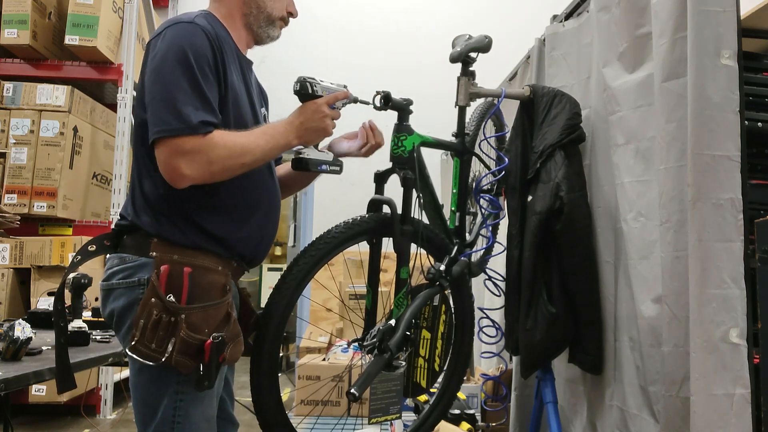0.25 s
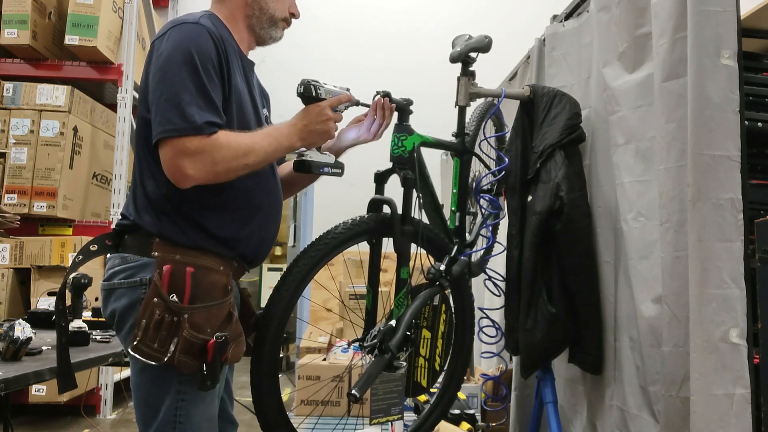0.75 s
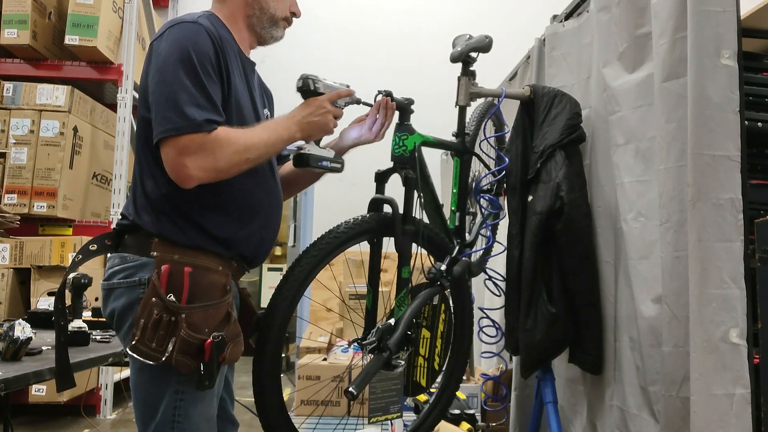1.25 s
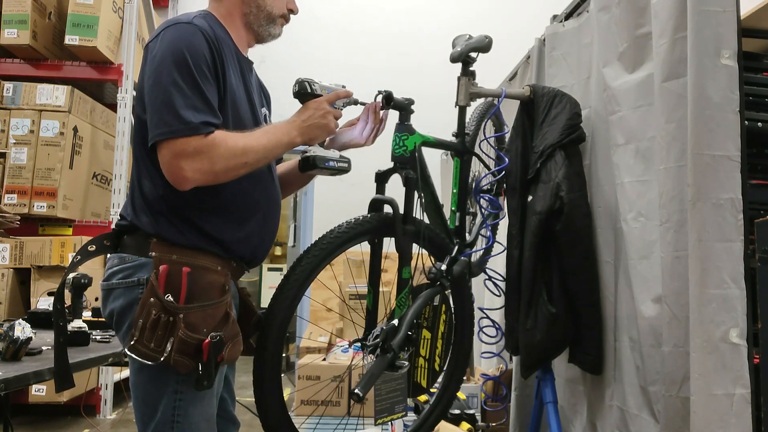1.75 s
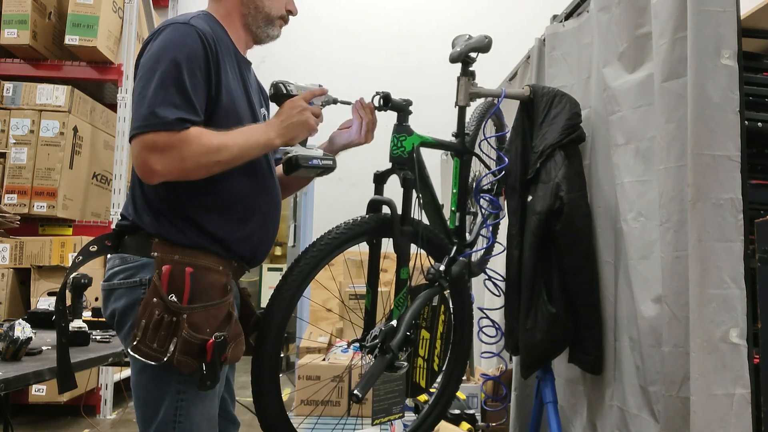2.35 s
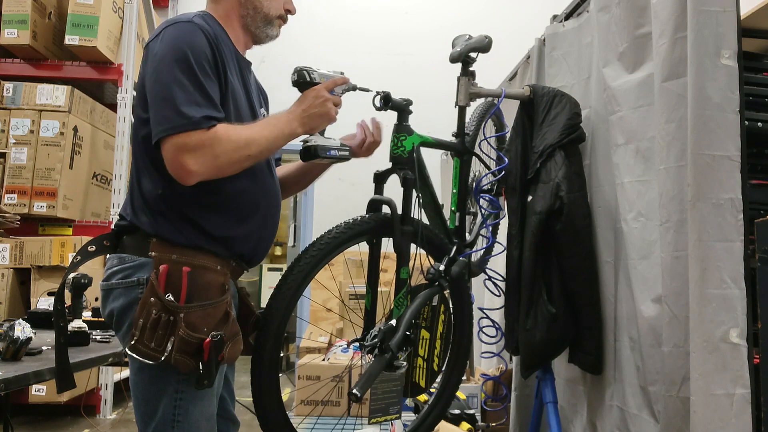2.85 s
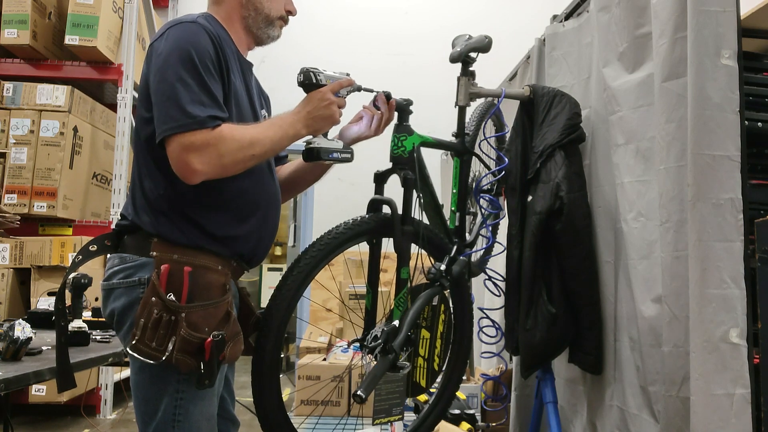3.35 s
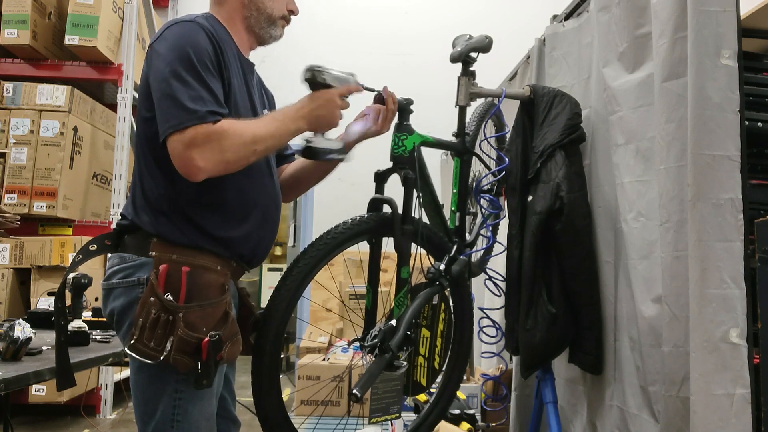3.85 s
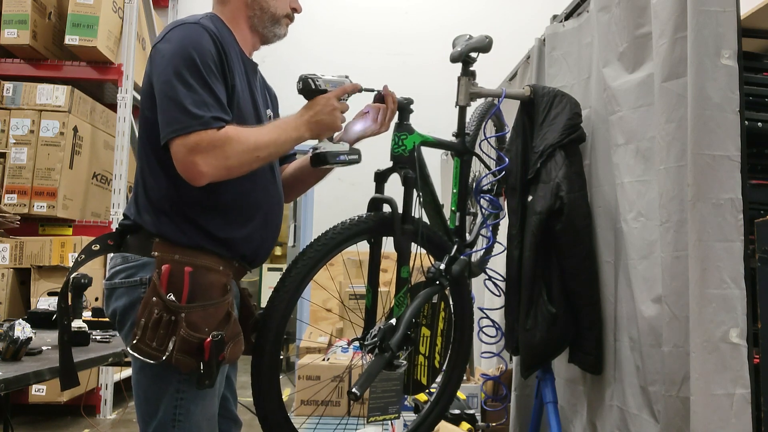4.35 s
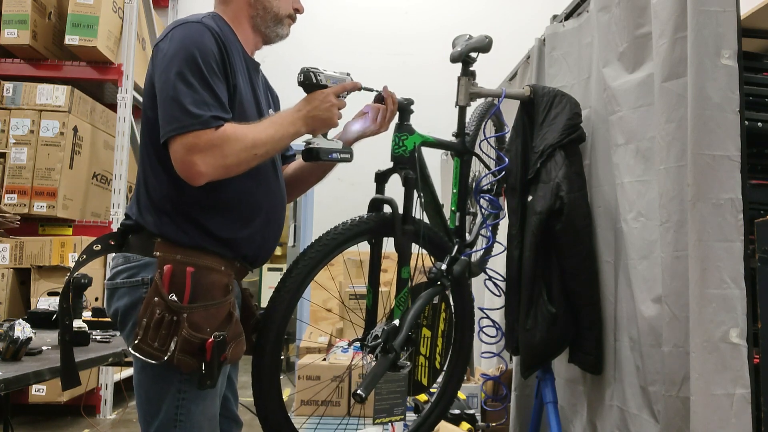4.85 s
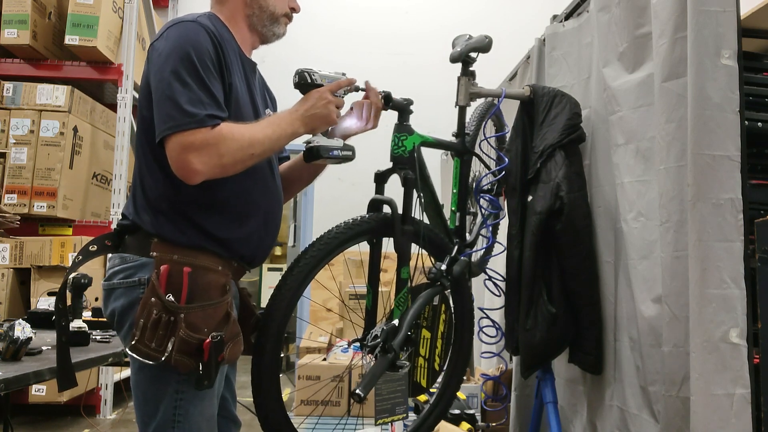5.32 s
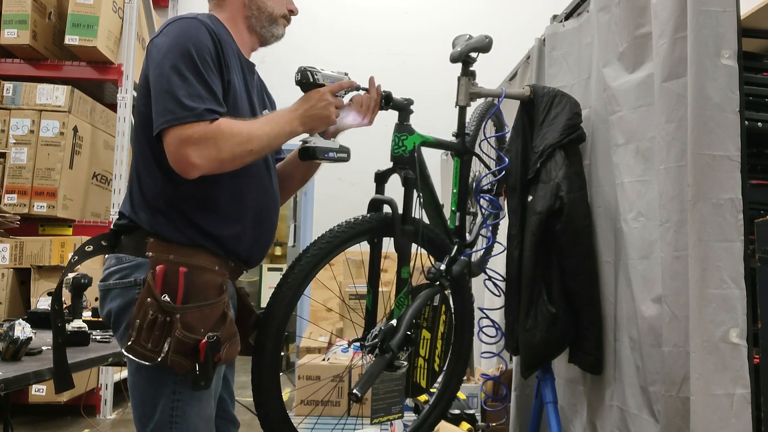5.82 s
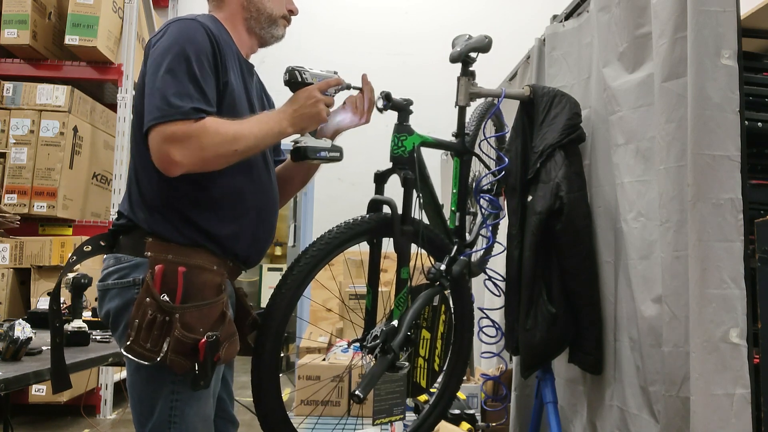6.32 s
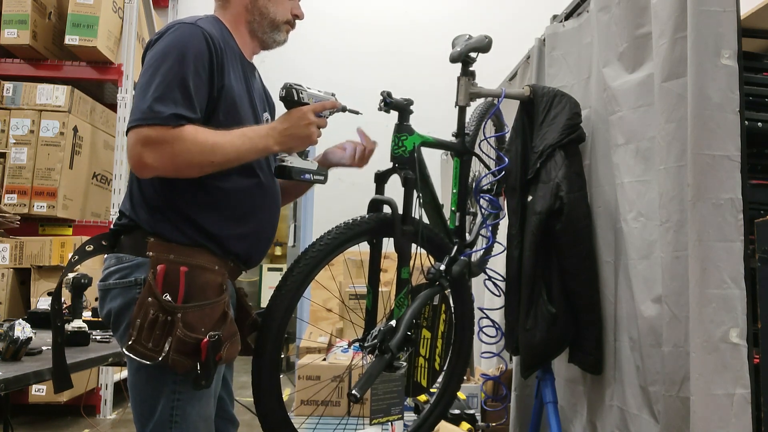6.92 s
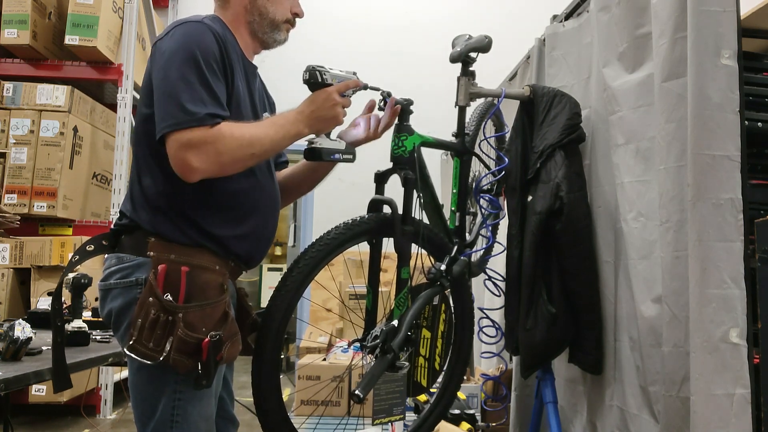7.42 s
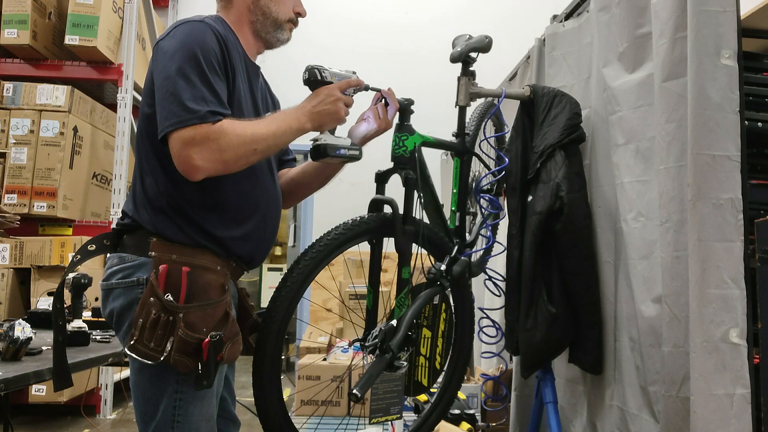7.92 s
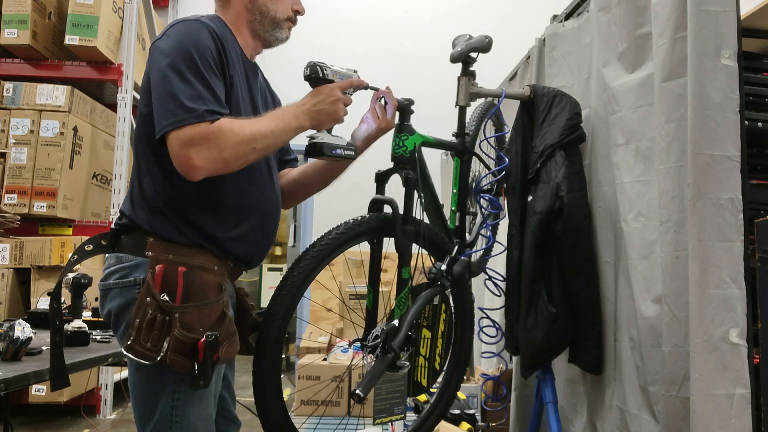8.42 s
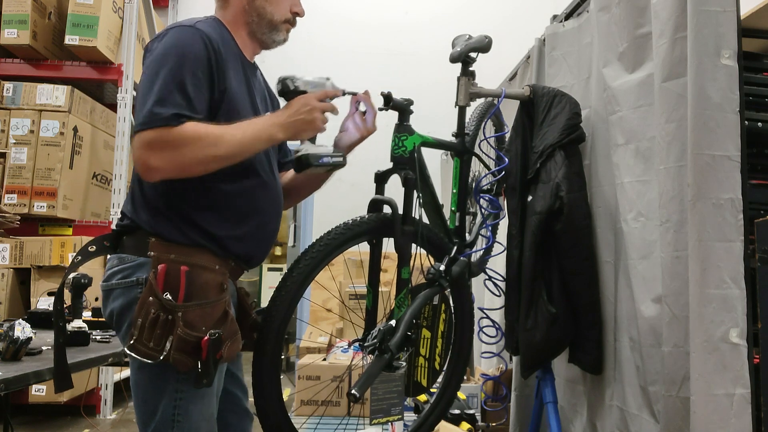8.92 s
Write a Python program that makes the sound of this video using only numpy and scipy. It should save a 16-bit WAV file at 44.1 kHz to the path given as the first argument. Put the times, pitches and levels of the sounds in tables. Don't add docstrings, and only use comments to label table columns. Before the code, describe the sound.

A quiet stockroom hums with ventilation. A close cordless screwdriver runs once for under a second, then gives three shorter buzzes amid trigger clicks and bright clinks of bit against steel bolts. A compressor across the room thuds, whines upward and settles into steady chugging, with one last screwdriver run over it. Small camera microphone, dull top end, hard-room echo.

```python
import sys
import numpy as np
from scipy import signal
from scipy.fft import rfft, irfft
from scipy.io import wavfile
from scipy.ndimage import uniform_filter1d

SR = 44100
rng = np.random.default_rng(int(sys.argv[2]) if len(sys.argv) > 2 else 0)


def file_out(sig):
    cols = np.atleast_2d(sig).T
    lim = np.clip(cols, -1, 1)
    pcm = np.round(lim * 32767).astype(np.int16)
    wavfile.write(sys.argv[1], SR, pcm)


def volts(x):
    e = np.asarray(x, float) / 20
    return 10 ** e


N = 404397
T = np.arange(N) / SR


def evened(x):
    return x / np.sqrt(np.mean(x ** 2) + 1e-20)


def read(points, hz):
    f, value = np.transpose(points)
    return np.interp(np.log(hz + 1), np.log(f + 1), value)


def add(mix, start_s, sound):
    part = mix[round(start_s * SR):][:len(sound)]
    part += sound[:len(part)]


def coloured(x, spectrum):
    gain = volts(read(spectrum, np.fft.rfftfreq(len(x), 1 / SR)))
    return evened(irfft(rfft(x) * gain, len(x)))


def resonate(x, hz, width_hz):
    turn = np.exp(2j * np.pi * np.cumsum(hz * np.ones(len(x))) / SR)
    r = np.exp(-np.pi * width_hz / SR)
    smooth = signal.lfilter([1 - r], [1, -r], x / turn)
    return evened((turn * smooth).real)


def wander(length, span):
    once = uniform_filter1d(rng.standard_normal(length), int(span))
    return evened(uniform_filter1d(once, int(span)))


# [Hz, dB per Hz]
VENTILATION = [(15, -34.5), (25, -22), (65, -3), (125, -6), (167, -7.5), (241, -8.5), (286, -12.5),
               (356, -8), (454, -18.5), (513, -17), (815, -21), (4820, -37), (6790, -40), (8450, -48),
               (11000, -85.5), (18600, -120)]
# [Hz, dB rms]
HUM_LINES = [(59.3, -65.5), (120, -63), (212.3, -65), (240.2, -60.5), (267.8, -74.5), (295.7, -76.5),
             (332.1, -69), (360, -73), (6700, -90)]


def stockroom():
    air = coloured(rng.standard_normal(N), VENTILATION) * volts(-59 + 1.4 * wander(N, 5000))
    lines = np.zeros(N)
    for hz, db in HUM_LINES:
        level = volts(db + 3 + 0.96 * wander(N, 3300))
        turns = hz * T + rng.random() + 0.041 * wander(N, 4000)
        lines += level * np.sin(2 * np.pi * turns)
    return air + lines


def ring(modes, t, t60_s, flutter_db):
    total = np.zeros(len(t))
    for hz, db, t60_factor in modes:
        luck_db, phase = 4 * rng.random(), rng.random()
        decay_db = -60 * t / (t60_factor * t60_s)
        rattle_db = flutter_db * (1.15 - abs(wander(len(t), 150)))
        total += volts(db + luck_db + decay_db + rattle_db) * np.sin(2 * np.pi * (hz * t + phase))
    return total


# [Hz, dB, ratio]
LOW_RING = [(3860, -11, 1.3), (4430, -7, 1.5), (4510, 0, .3), (4600, -4, .25), (5230, -13, 1),
            (3300, -17, .8)]
# [Hz, dB, ratio]
HIGH_RING = [(6600, -9, 1), (6965, -2, 1.5), (7527, 0, 1), (7628, -3, 1.1)]


def hit(tick_db, low_db, high_db, knock_db, t60_s):
    t = np.arange(SR // 4) / SR
    crack, puff = rng.standard_normal((2, len(t)))
    tick = coloured(crack, [(800, -36.0), (3000, 4.5), (7000, 5), (9000, -16.0)])
    tick *= volts(-60 * t / .018) + volts(-13 - 60 * t / (.7 * t60_s))
    knock = coloured(puff, [(350, -28.5), (700, -15), (1300, 1.5), (2500, -2.5), (5000, -17.5)])
    knock *= volts(knock_db - 60 * t / 0.093)
    low = volts(low_db) * ring(LOW_RING, t, t60_s, flutter_db=9.0)
    high = volts(high_db) * ring(HIGH_RING, t, t60_s, flutter_db=7.5)
    onset = np.minimum(t / .001, 1)
    return volts(tick_db - 10.5) * (tick + knock + low + high) * onset


# tick_db, low_ring_db, high_ring_db, knock_db [dB]
DROPPED_BOLT = (-24.5, -15, -12.5, -12.5)
# [s, dB]
CLINKS = [(0.8742, -63, -8, -10, -14), (2.5212, -39.5, -6, -6, -1.5), (2.5686, -28.5, -0.5, -2.5, -7),
          (2.579, -27.5, -11, -4, -19), (2.5895, -32, -22.5, 1, -17), (2.652, -36, -29, -11, -7),
          (3.093, -47, -3, -5, -3), (3.204, -39, -2, -6, -16.5), (3.23, -50, -7, 1, 1.5),
          (3.3752, -46, -4, -2, -3), (5.4458, -25.5, -10, -12.5, -19), (5.5924, -34.5, -14, -14, -1.5),
          (6.325, -37, -17, -5.5, 5.5), (6.6609, -38, -9.5, -0.5, -11.5), (6.6804, -36, -13.5, 0.5, 1),
          (6.7035, -32, -10, -9.5, -6), (7.589, -53.5, -10, -5, -1)]


def steel_clinks():
    layer = np.zeros(N)
    add(layer, 0, hit(*DROPPED_BOLT, t60_s=.2))
    for start_s, *levels in CLINKS:
        add(layer, start_s, hit(*levels, t60_s=0.11))
    return layer


def sing(hz, db, rise_s, t60_s, waver=.11):
    t = np.arange(2 * SR) / SR
    decay_db = -60 * np.maximum(t - rise_s, 0) / t60_s
    level = volts(db + decay_db + 18 * waver * wander(len(t), 400))
    turns = hz * t + waver * wander(len(t), 500)
    return np.minimum(t / rise_s, 1) * level * np.sin(2 * np.pi * turns)


# [s, Hz, dB, s, s]
SINGS = [(.8, 3550, -70, .32, .12), (0, 4450, -55, .002, .55), (3.03, 1970, -68, .05, .6),
         (3.08, 1570, -66, .07, .5), (3.74, 6950, -74, .02, .3), (3.4, 2700, -70, .03, .5),
         (4.28, 1560, -72, .08, .5), (.462, 5380, -63, .004, .5), (.462, 3600, -62, .004, .3),
         (.462, 4600, -64, .004, .45), (0, 5400, -62, .002, .5), (6.1, 2670, -38, .04, .5),
         (4.72, 2700, -42, .04, .6), (1.15, 900, -58, .006, .12), (.002, 1450, -58, .005, .4),
         (7.535, 6620, -64, .004, .4), (7.535, 1600, -60, .01, .3)]


def thin_rings():
    layer = np.zeros(N)
    for start_s, *tone in SINGS:
        add(layer, start_s, sing(*tone))
    return layer


# [s, dB]
CLICKS = [(0.46, -36.5, -35, -10), (1.129, -62.5, -23, 8), (1.1538, -52.5, -22, 8), (1.29, -55, -19, 0),
          (1.3067, -54, -31, -1), (1.4446, -50.5, -22, -16), (1.4848, -29, -18.5, -5),
          (2.172, -30.5, -40, 11.5), (3.5835, -58, -15, 4), (4.442, -56.5, -15, -4),
          (4.4757, -45, -15, 5.5), (4.506, -17.5, -34, -10), (5.8036, -41, -21, -7.5),
          (5.847, -21.5, -32, -13), (6.125, -8, -45.5, -26), (6.1358, -26, -47, -11), (6.4332, -31, -7, -9),
          (7.535, -48, -27, 5), (7.6972, -41.5, -8, -7)]


def plastic_clicks():
    layer = np.zeros(N)
    for start_s, tick_db, high_db, knock_db in CLICKS:
        add(layer, start_s, hit(tick_db, -60, high_db, knock_db, t60_s=0.11))
    return layer


# [of the mesh rate, dB]
MESH_ORDERS = [(1, -13), (2, 5), (3, 3.5), (4, 3.5), (5, 5), (6, 0.5)]
# [Hz, Hz, dB]
CHUCK_MODES = [(2350, 50, -7), (2460, 50, -6), (2570, 50, -3), (2670, 40, 2), (2800, 50, -2)]
# [Hz, Hz, dB]
HANDLE_MODES = [(885, 60, 0), (1035, 60, 0), (1190, 70, -2)]


def driver(pull_s, release_s, spin_up_s, mesh_hz, top_db, grip, casing):
    t = np.arange(0, release_s - pull_s + 0.47, 1 / SR)
    n = len(t)
    whine_db, chuck_db, growl_db = grip
    speed = 1 - np.exp(-(t + .01) / spin_up_s)
    coasting_s = np.maximum(t - release_s + pull_s, 0)
    engage = .45
    mesh = mesh_hz * (engage + (1 - engage) * speed) * np.exp(-coasting_s / .25)
    below_db = 32.5 * np.log10(speed) - 192.5 * coasting_s

    turns = np.cumsum(mesh * (1 + .019 * wander(n, 200))) / SR
    whine = np.zeros(n)
    for k, db in MESH_ORDERS:
        whine += volts(db + 4.5 * wander(n, 200)) * np.sin(2 * np.pi * k * turns)
    strain_db = 6 * (1 - speed)

    rub = rng.standard_normal(n) * volts(1.3 * wander(n, 73))
    chuck = sum(volts(db) * resonate(rub, hz, width) for hz, width, db in CHUCK_MODES)
    growl = sum(volts(db) * resonate(rub, hz, width) for hz, width, db in HANDLE_MODES)

    gears = coloured(rub, casing) + volts(whine_db + strain_db) * coloured(whine, casing)
    sound = volts(below_db) * gears
    sound += volts(growl_db + 0.48 * below_db) * evened(growl)
    sound += volts(chuck_db + 0.56 * below_db) * evened(chuck)
    return volts(top_db) * sound * signal.windows.tukey(n, .05)


# [s, s, s, Hz, dB]
PULLS = [
    (1.495, 2.186, 0.12, 1697, -24.5),
    (4.515, 4.717, 0.087, 1486, -24.5),
    (4.955, 5.325, 0.053, 1462, -24.5),
    (5.864, 6.106, 0.05, 1454, -26),
    (8.31, 8.948, .1, 1681, -24),
]
# whine_db, chuck_db, growl_db [dB against the noise]
GRIPS = [
    (-7, -16.5, -20.5),
    (-6, -12.5, -17.5),
    (-4.5, -11.5, -20.5),
    (-11, -8.5, -28),
    (-6, -8.5, -23.5),
]
# [Hz, dB per Hz]
CASINGS = [
    [(400, -36), (641, -33), (1140, -9), (2100, -11), (3330, -3), (5140, -5.5), (5990, -11.5), (6980, -3.5),
     (8450, -27)],
    [(400, -34.5), (658, -27), (1420, -1), (2130, -8.5), (2860, -2), (5480, -3), (6140, -10), (7070, 2),
     (8450, -26.5)],
    [(400, -37.5), (666, -25), (1150, -6.5), (2080, -10.5), (4030, -2), (4410, -4), (5200, -9.5),
     (7160, -6.5), (8450, -25.5)],
    [(400, -38), (650, -38.5), (1020, -8), (1690, -14), (2710, -5.5), (4240, -1.5), (4940, -9), (6890, -7),
     (8450, -25.5)],
    [(400, -16.5), (1140, -7.5), (1900, -22), (3330, 1.5), (5140, -2.5), (5990, -7), (6980, 1), (7730, -9),
     (8450, -30)],
]


def screwdriver():
    layer = np.zeros(N)
    for pull, grip, casing in zip(PULLS, GRIPS, CASINGS):
        add(layer, pull[0], driver(*pull, grip, casing))
    return layer


# [s, Hz, dB, s, s]
CLEAR_SINGS = [
    (6.448, 6958, -43.5, .05, 1.5),
    (6.1262, 6900, -17, .0012, .015),
]


def hanging_steel():
    layer = np.zeros(N)
    for start_s, *tone in CLEAR_SINGS:
        add(layer, start_s, sing(*tone, waver=.03))
    start_s, hz, db, rise_s, t60_s = CLEAR_SINGS[0]
    add(layer, start_s, -sing(hz + 5.4, db - 2, rise_s, t60_s / 2, waver=.03))
    return layer


# [Hz, dB per Hz]
TANK = [(24, -59.5), (40, -27), (201, -7), (243, -9.5), (287, -1), (354, -11), (455, -11), (516, -9),
        (664, -16.5), (802, -11.5), (1270, -9), (1380, -3.5), (1820, -33.5), (3700, -29), (6000, -56),
        (7800, -70), (13200, -120)]
# [Hz, Hz, dB]
TANK_MODES = [(125, 50, -10.5), (240.4, 9.3, -0.5), (348, 70, -0.5), (527, 10, -12.5), (845, 61, -9.5),
              (900, 20, -5), (1116, 53, -5)]


def tank_body(t, hz, settled, crank):
    shake = rng.standard_normal(len(t)) * (1 + 0.051 * np.cos(4 * np.pi * crank))
    modes = sum(volts(db) * resonate(shake, f, width) for f, width, db in TANK_MODES)
    body = evened(coloured(shake, TANK) + volts(-11.5) * modes)
    f, frame_s, z = signal.stft(body, SR, nperseg=1024)
    at = frame_s + t[0]
    reach = np.interp(at, t, hz) / (f[:, None] + 1)
    dull_db = -16.0 * np.clip(1.7 * (1 - reach), 0, 1) * (1 - np.interp(at, t, settled))
    return signal.istft(z * volts(dull_db), SR, nperseg=1024)[1][:len(t)]


# [s, Hz]
RUN_UP = [
    (7.7, 60),
    (7.9, 650),
    (8.0, 1000),
    (8.05, 1200),
    (8.11, 1270),
    (8.3, 1300),
    (8.4, 1345),
    (8.55, 1356),
    (9.17, 1356),
]
# [of the crank rate, dB rms]
CRANK_ORDERS = [(7, -51), (9, -50), (11, -43), (13, -49), (14, -47), (16, -45), (17, -46), (19, -39),
                (20, -35), (21, -37), (22, -39), (24, -43), (26, -47), (27, -46), (29, -39), (31, -41),
                (33, -47), (46, -50), (64, -46), (65, -47), (68, -44), (69, -43), (70, -45), (75, -45),
                (92, -46), (94, -48), (95, -46)]
# [Hz, dB per Hz]
INTAKE = [(940, -20), (1600, -5), (2070, -4.5), (2350, -1.5), (2700, -7.5), (2770, -9.5), (3540, -14.5),
          (4180, -20), (5840, -17), (6950, -1.5), (7940, -24), (8450, -39), (11000, -71), (18600, -120)]


def compressor():
    time_s, whine_hz = np.transpose(RUN_UP)
    start_s, whine_per_turn = time_s[0], 113.26
    t = np.arange(start_s, N / SR, 1 / SR)
    hz = np.interp(t, time_s, whine_hz)
    speed = hz / hz[-1]
    crank = np.cumsum(hz) / SR / whine_per_turn
    settled = np.clip(speed, 0, 1) ** 4
    steady = np.clip(speed, 0, 1) ** 14

    housing_db = -10 * np.log10(1 + ((hz - 1258) / 50) ** 2)
    whine = np.sqrt(2) * np.sin(2 * np.pi * whine_per_turn * crank)
    whine *= 1 + .3 * np.cos(2 * np.pi * crank)
    whine_db = -27 + housing_db + 10 * np.log10(speed)

    smear = resonate(rng.standard_normal(len(t)), 0.95 * hz, 220)
    swell = resonate(smear, 0.97 * hz, 170)
    swell_db = -19 + 2.08 * housing_db - 9 * steady ** 3

    orders = np.zeros(len(t))
    for k, db in CRANK_ORDERS:
        orders += volts(db + 4.0) * np.sin(2 * np.pi * (k * crank + .2 * k ** 2))
    body = tank_body(t, hz, settled, crank)
    body_db = -27 + 30 * np.log10(1.01 - np.exp(-(t - start_s) / 0.11)) - 3.5 * steady

    hiss = coloured(rng.standard_normal(len(t)), INTAKE) * (1 + 0.12 * np.cos(4 * np.pi * crank))
    hiss_db = -35.5 + 20.5 * np.log10(speed)

    sound = volts(swell_db) * swell + volts(whine_db) * whine + volts(body_db) * body
    sound += steady * orders + volts(hiss_db) * hiss
    layer = np.zeros(N)
    add(layer, start_s, sound * np.minimum((t - start_s) / 0.0082, 1))
    return layer


# [s, Hz, dB, s, s]
THUDS = [
    (7.71, 126, -31, 0.092, 0.32),
    (7.76, 55.3, -40, 0.1, 0.55),
    (7.82, 224, -34, 0.031, 0.25),
    (7.97, 310.5, -22.5, 0.0092, 0.33),
    (8.03, 125.3, -30, 0.07, .4),
    (7.72, 312, -47, 0.069, .5),
]


def tank_thuds():
    layer = np.zeros(N)
    for start_s, *tone in THUDS:
        add(layer, start_s, sing(*tone))
    return layer


# [Hz, s]
ROOM = [(200, 1), (1000, 0.85), (3000, 0.6), (8000, 0.33)]


def echoes(x):
    taps = np.zeros(SR)
    at = np.arange(300, SR - 20, 20) + rng.integers(0, 20, (SR - 301) // 20)
    taps[at] = rng.choice([-1., 1.], len(at))
    hz, t, z = signal.stft(taps, SR, nperseg=256)
    decay_db = -60 * t / read(ROOM, hz)[:, None]
    tail = signal.istft(z * volts(decay_db), SR, nperseg=256)[1]
    return signal.fftconvolve(x, tail / np.linalg.norm(tail))[:N]


def scene():
    room = stockroom()
    clinks = steel_clinks() + plastic_clicks()
    tool = screwdriver()
    far = thin_rings() + hanging_steel() + compressor() + tank_thuds()
    wet = echoes(volts(-11.5) * tool + volts(-0.5) * clinks)
    return (volts(-1.5) * tool + clinks + wet + far + room)[None]


def band_limit(x):
    return signal.sosfilt(signal.butter(12, 8960, fs=SR, output="sos"), x)


def record(dry):
    power_db = 10 * np.log10(abs(uniform_filter1d(dry[0] ** 2, 4000)) + 1e-12)
    bass = signal.sosfiltfilt(signal.butter(4, 450, fs=SR, output="sos"), dry)
    before_pump = T < RUN_UP[0][0]
    lift_db = 5.0 * np.clip((power_db + 51) / 18, 0, 1) * before_pump
    opened = dry + bass * (volts(lift_db) - 1)
    band = signal.firwin(numtaps=301, cutoff=8280, window=("kaiser", 9), fs=SR)
    limited = signal.oaconvolve(opened, band[None], "same")
    return band_limit(limited)


dry = scene()
out = record(dry)
file_out(out)
```